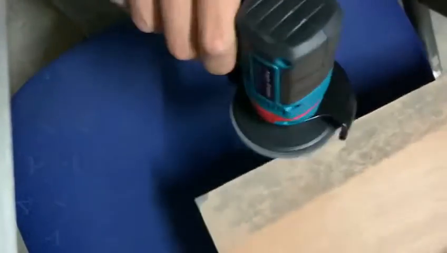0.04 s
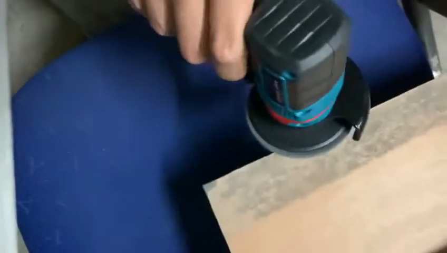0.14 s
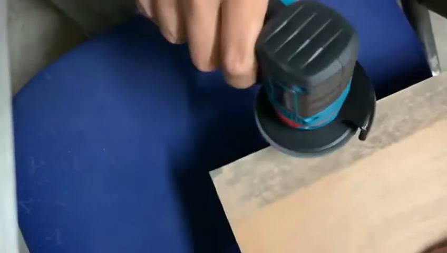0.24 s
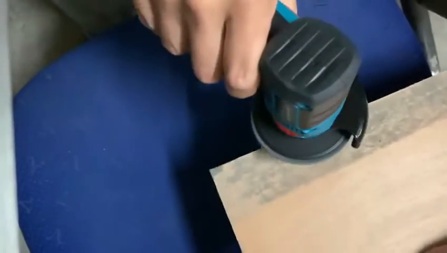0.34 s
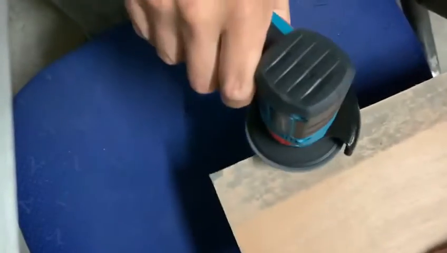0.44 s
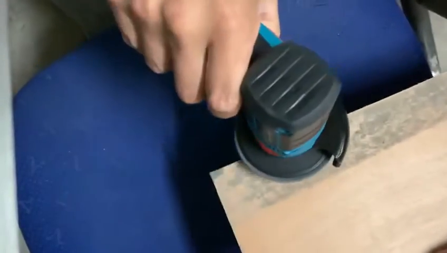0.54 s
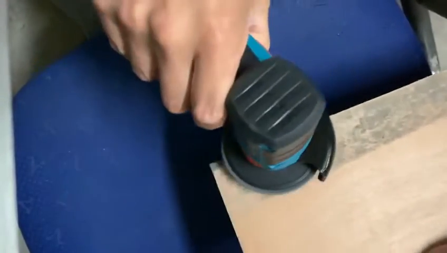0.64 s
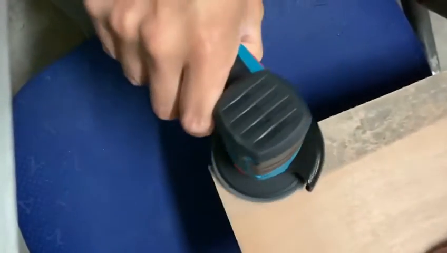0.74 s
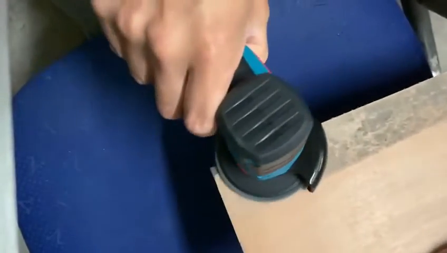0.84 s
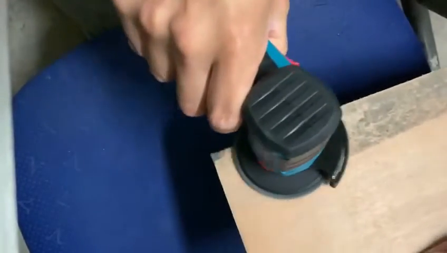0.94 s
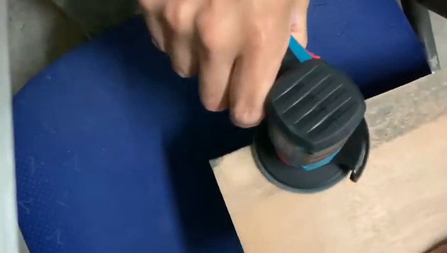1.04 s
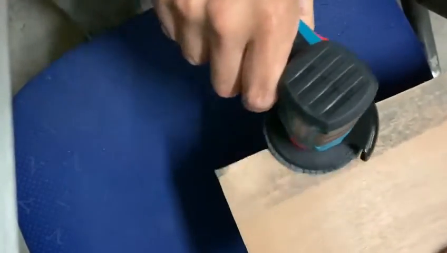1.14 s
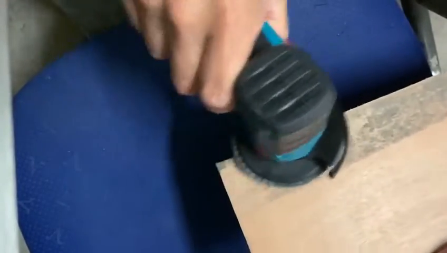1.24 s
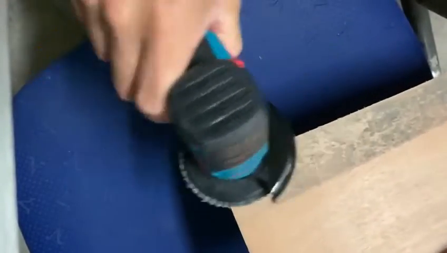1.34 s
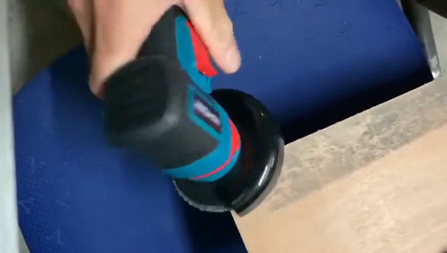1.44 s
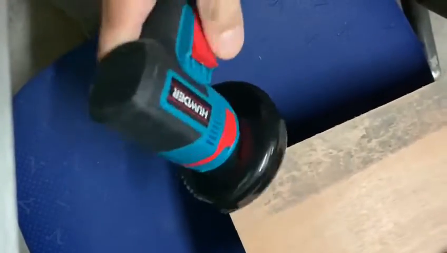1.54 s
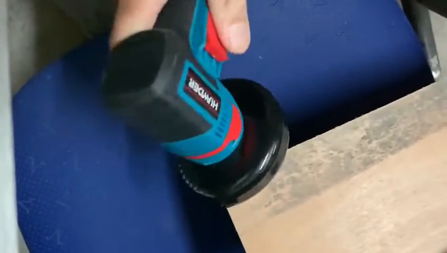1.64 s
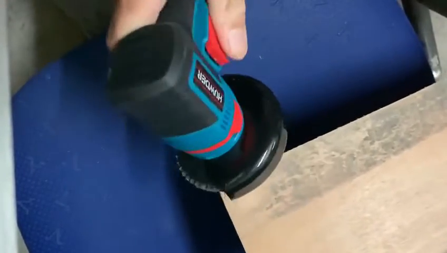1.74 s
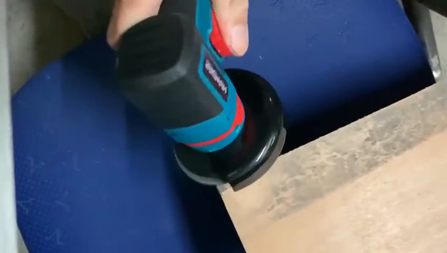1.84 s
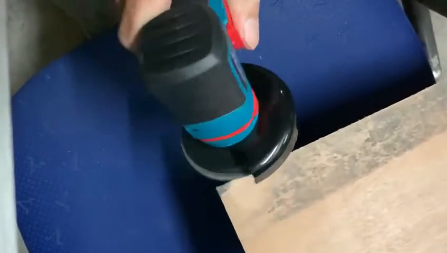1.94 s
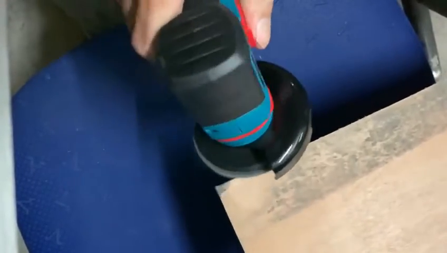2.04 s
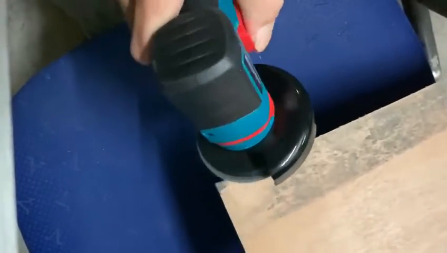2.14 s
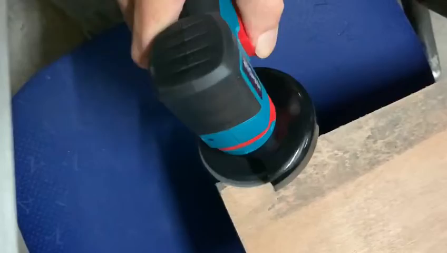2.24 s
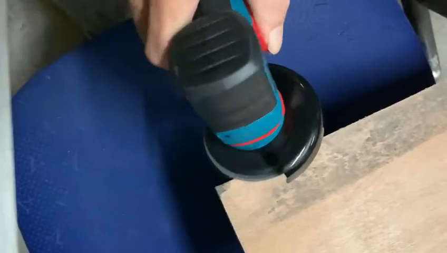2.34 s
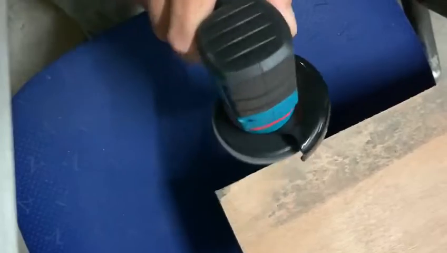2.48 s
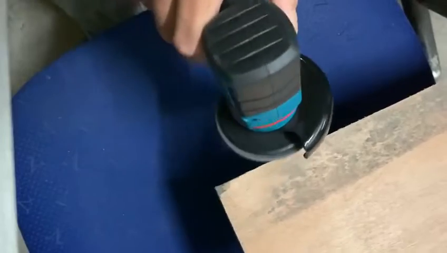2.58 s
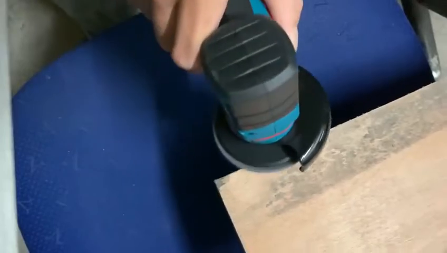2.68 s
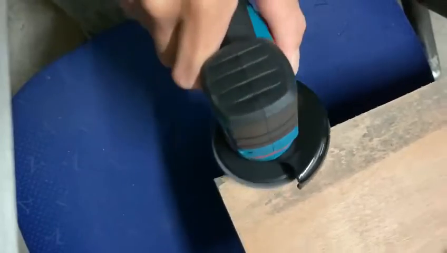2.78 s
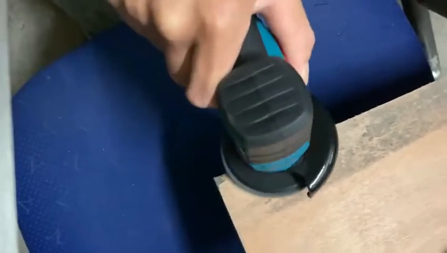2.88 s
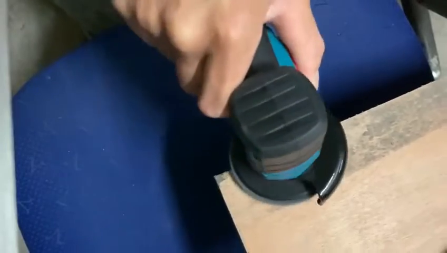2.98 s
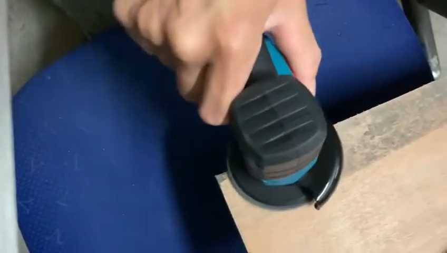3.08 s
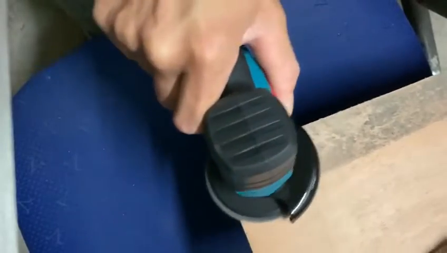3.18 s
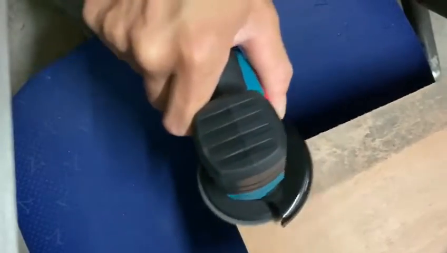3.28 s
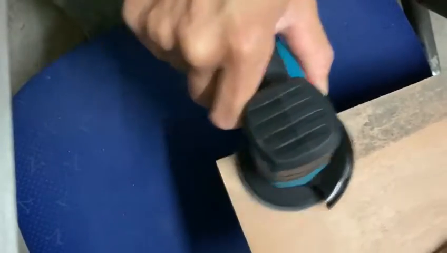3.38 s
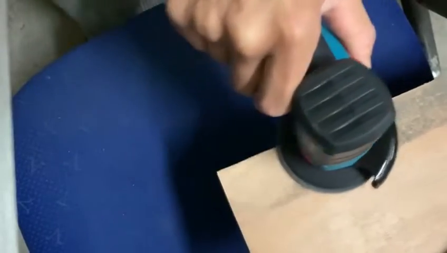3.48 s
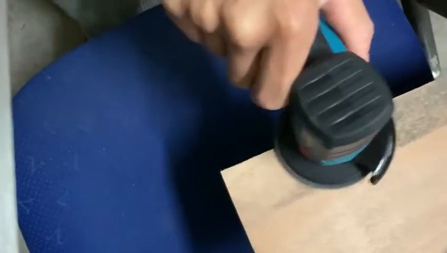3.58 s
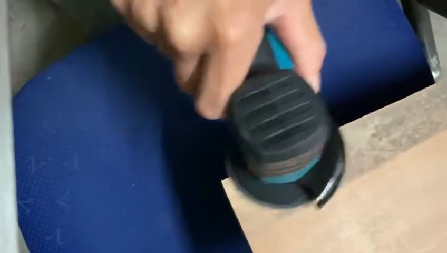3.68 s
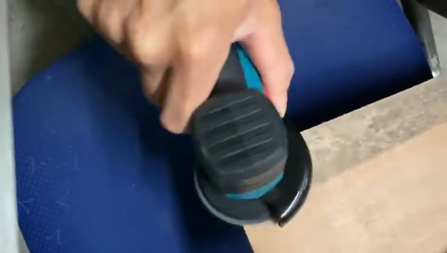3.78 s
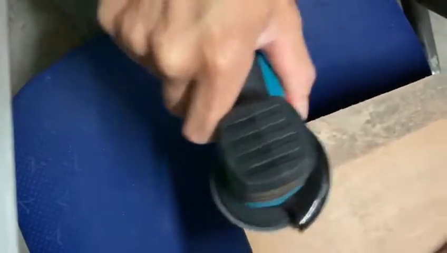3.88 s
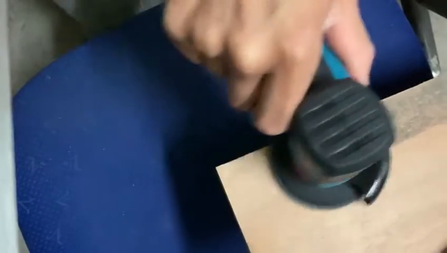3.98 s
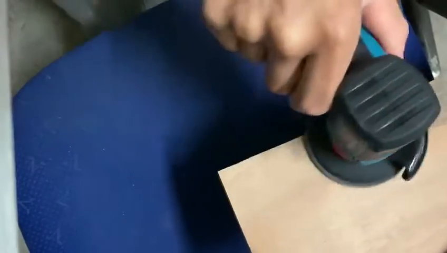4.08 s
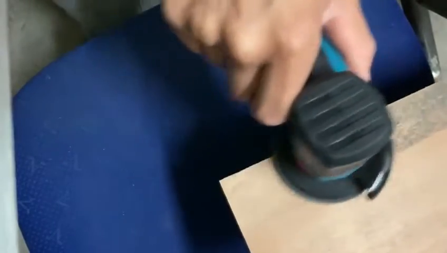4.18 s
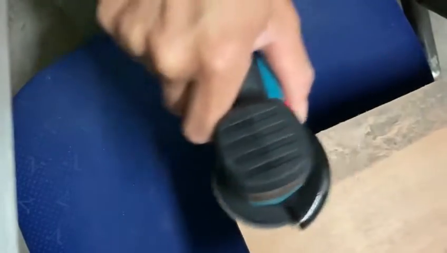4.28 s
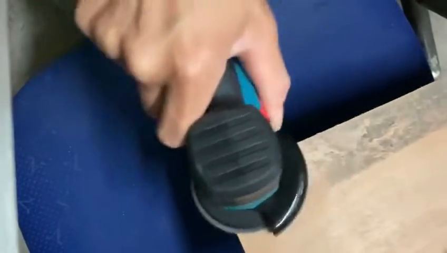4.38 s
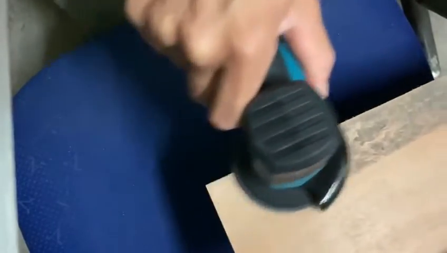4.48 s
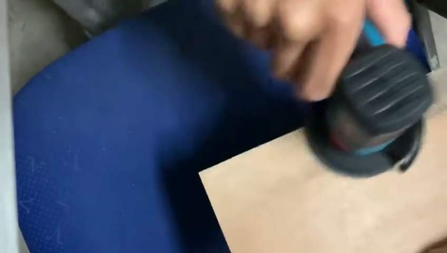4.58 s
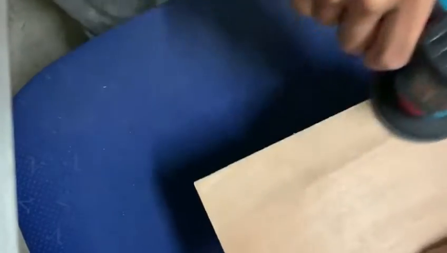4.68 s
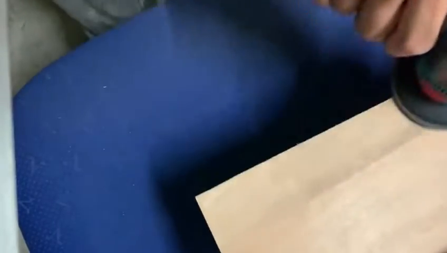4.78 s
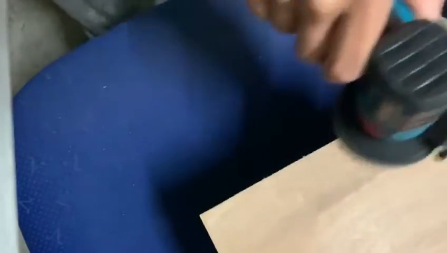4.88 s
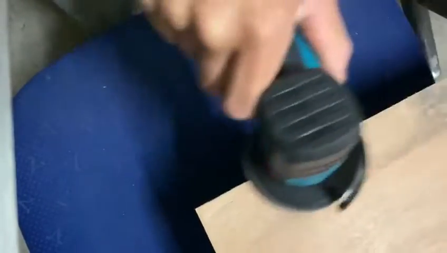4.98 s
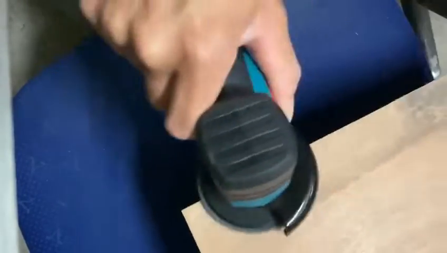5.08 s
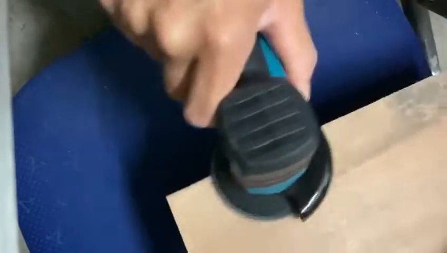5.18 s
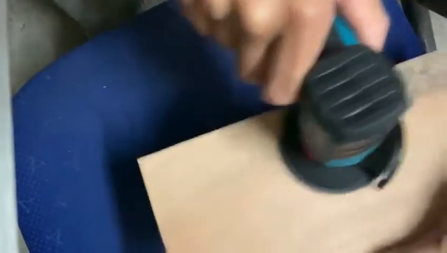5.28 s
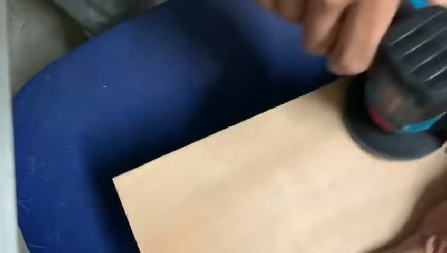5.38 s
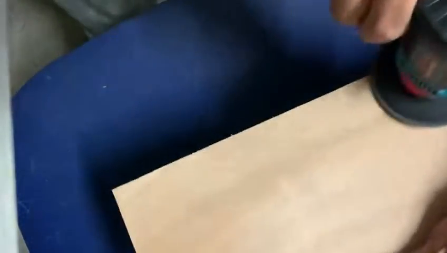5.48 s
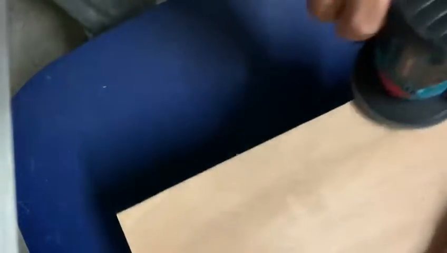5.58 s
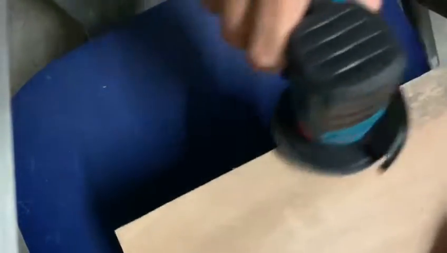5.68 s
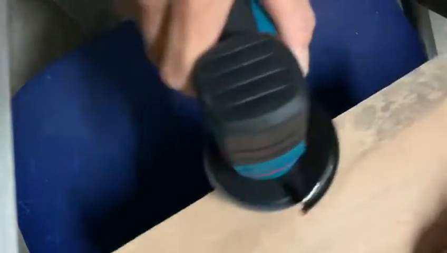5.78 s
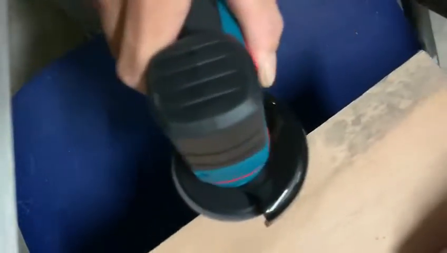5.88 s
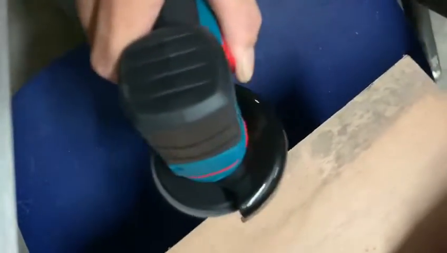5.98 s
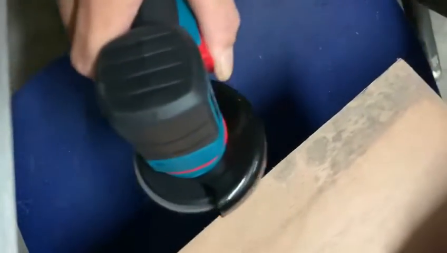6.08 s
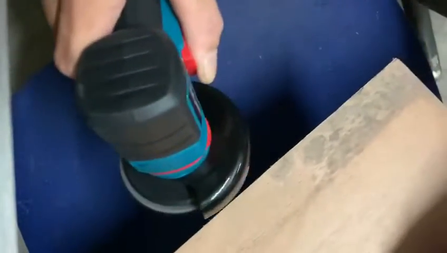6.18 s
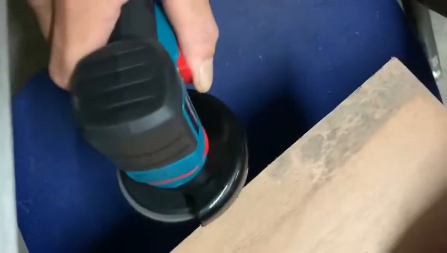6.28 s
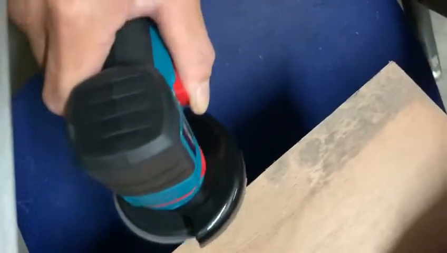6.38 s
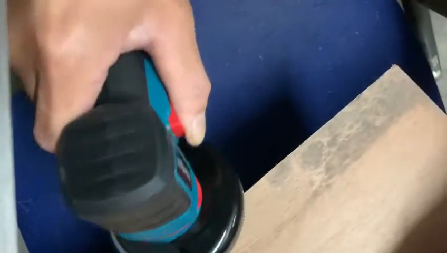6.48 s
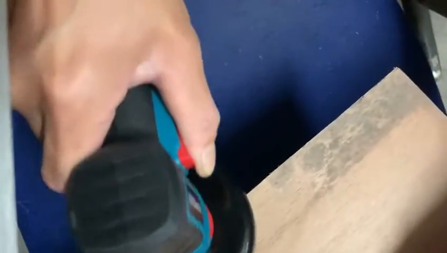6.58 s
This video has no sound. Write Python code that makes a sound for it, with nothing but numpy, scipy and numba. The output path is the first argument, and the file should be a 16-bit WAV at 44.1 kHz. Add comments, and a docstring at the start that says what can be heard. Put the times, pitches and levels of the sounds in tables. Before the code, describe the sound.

A small cordless grinder whines close up, stalls against a board edge, clicks back on, spins up and rasps wood in dipping strokes.

```python
"""A small cordless grinder runs close to a phone, shaft and magnet orders whining over fan hiss and disc wind.
It bites the edge of a board and stalls; single flaps scrape, then a thumb rubs and slides the plastic switch.
It spins up again with coil buzz and a high whistle, and is pressed on the wood in strokes that drag its speed
down: the flap disc rasps in a pattern that comes round every turn, and at times sings. It ends running off the
wood. A small hard room rings briefly throughout, over quiet room noise and a distant hum."""
import sys
import numpy as np
from scipy import signal
from scipy.fft import rfft, irfft
from scipy.io import wavfile
from scipy.ndimage import uniform_filter1d
from numba import njit

SR = 44100
rng = np.random.default_rng(int(sys.argv[2]) if len(sys.argv) > 2 else 0)


def store_pcm(level_fs):
    """Save levels as 16-bit WAV."""
    pcm = np.round(np.clip(level_fs, -1, 1) * 32767).astype(np.int16)
    wavfile.write(sys.argv[1], SR, np.atleast_2d(pcm).T)


N = 292383
TIME = np.arange(N) / SR
FREQ = np.fft.rfftfreq(N, 1 / SR) + 1  # 1 Hz up, so that no bin is zero


def undb(db):
    """Level in dB to gain."""
    return 10 ** (np.asarray(db) / 20)


def unit(x):
    """Scale x to an RMS of 1."""
    return x / np.sqrt(np.mean(x ** 2))


def noise():
    """White noise as long as the scene."""
    return rng.standard_normal(N)


def curves(table, outside=None):
    """Columns of a timed table, one value a sample."""
    time_s, *columns = np.transpose(table)
    return [np.interp(TIME, time_s, column, outside, outside) for column in columns]


def shape(points):
    """Gain per frequency through (pitch_hz, level_db) points."""
    pitch_hz, level_db = np.transpose(points)
    return undb(np.interp(np.log(FREQ), np.log(pitch_hz), level_db))


def bump(hz, centre_hz, width_hz, db):
    """Lift in dB around a resonance."""
    return db / (1 + (2 * (hz - centre_hz) / width_hz) ** 2)


def band(x, gain, lo_hz=0, hi_hz=SR):
    """Colour x and keep lo-hi with steep edges."""
    edges = 1 / np.sqrt((1 + (lo_hz / FREQ) ** 12) * (1 + (FREQ / hi_hz) ** 12))
    return irfft(rfft(x) * gain * edges, N)


def walk(rate):
    """Random levels held 1 / rate s and slewed twice; spread near 1."""
    size = int(SR / rate)
    steps = np.repeat(rng.standard_normal(N // size + 1), size)
    return 1.367 * uniform_filter1d(uniform_filter1d(steps, size), size)[:N]


def even(x, span_s=.06):
    """Hold the running level of x near 1 by dividing by its smoothed RMS."""
    size = int(span_s * SR)
    return x / np.sqrt(uniform_filter1d(uniform_filter1d(x ** 2, size), size))


@njit
def turns(x, hz, like):
    """Each turn replays part of the one before: the same flaps meet the same wood."""
    y = np.zeros(len(x))
    for i in range(len(x)):
        back = i - int(SR / hz[i] + .5)
        fresh = np.sqrt(1 - like[i] ** 2) * x[i]
        y[i] = fresh + (like[i] * y[back] if back >= 0 else 0.)
    return y


def touch(start, end, attack, release, first_db, last_db):
    """Gain of one contact: rise, hold, lift, falling 20 dB over one attack or release time."""
    outside = np.maximum(start - TIME, 0) / attack + np.maximum(TIME - end, 0) / release
    return undb(np.interp(TIME, [start, end], [first_db, last_db]) - 20 * np.minimum(outside, 8))


# Shaft speed: brake, soft start, then a dip under each stroke. Columns: time_s, turns_hz
SPEED = [(0, 247), (.26, 251.7), (.89, 251.5), (.925, 225), (1.02, 82), (1.08, 40), (1.77, 34.3),
         (1.85, 77), (1.885, 104), (1.93, 127.5), (2.03, 158), (2.14, 181.8), (2.33, 208.5), (2.49, 232),
         (2.58, 242), (2.68, 249), (3.05, 252.4), (3.13, 237.5), (3.27, 243.8), (3.38, 227.5), (3.46, 225),
         (3.55, 228.7), (3.67, 245), (3.79, 244.5), (4.01, 217), (4.25, 246.6), (4.4, 247.5), (4.46, 236),
         (4.62, 188.5), (4.68, 190), (4.78, 215.6), (4.89, 238.5), (5.12, 252), (5.19, 236.4), (5.3, 194.5),
         (5.43, 199.8), (5.5, 218.9), (5.61, 240.8), (5.83, 249.4), (6.08, 251.4), (6.63, 253)]
FREE_HZ, UP_TO_SPEED_S = 252, 3.0


def shaft():
    """Turning rate, running angle, and the speed lost to the wood once the tool is up to speed."""
    hz = uniform_filter1d(curves(SPEED)[0], size=SR // 25)
    angle = 2 * np.pi * np.cumsum(hz) / SR
    drag_hz = np.maximum(FREE_HZ - hz, 0) * (TIME > UP_TO_SPEED_S)
    return hz, angle, drag_hz


# Levels of the running tool as they rise and fall over time.
# Columns: time_s, fan_hiss_db, whine_db, third_order_db, disc_wind_db
TOOL_LEVELS = [(0, -19.5, -34.5, -37.5, -29.5), (.28, -19.5, -34, -30.5, -35), (.72, -24, -33, -34, -28),
               (.85, -25.5, -27.5, -23.5, -25), (.9, -27, -36.5, -40, -46), (.95, -33.5, -38.5, -42, -41),
               (1.0, -37.5, -45.5, -59, -45), (1.1, -42.5, -58, -60, -60), (1.2, -53.5, -77, -66, -63),
               (1.35, -79, -81.5, -69, -68.5), (1.75, -84.5, -70.5, -72.5, -70),
               (1.775, -46, -70, -72, -67), (1.83, -38, -69, -72, -63), (1.9, -33, -50.5, -67, -52),
               (2.1, -29.5, -41.5, -61, -38), (2.49, -23.5, -37, -45, -31),
               (3.02, -21.5, -36.5, -30.5, -25), (3.2, -32, -36.5, -56, -32.5),
               (3.42, -34.5, -39.5, -71, -30.5), (3.6, -34, -49.5, -60, -29.5),
               (3.77, -28.5, -34, -44, -31), (3.97, -41, -44.5, -57, -35.5), (4.2, -35, -48, -47, -34),
               (4.39, -54, -34.5, -53, -27.5), (4.65, -42.5, -45.5, -48, -44),
               (4.9, -32.5, -49.5, -64, -36.5), (5.05, -35.5, -44, -45, -35),
               (5.15, -32.5, -31.5, -44, -31.5), (5.33, -40, -48, -44.5, -25), (5.52, -38, -49, -53, -44),
               (5.64, -33.5, -48.5, -55, -42), (5.78, -31, -42.5, -56, -39.5),
               (6.1, -33, -41, -47.5, -37.5), (6.63, -34, -40.5, -55, -42)]
SWITCHED_ON_S = 1.762


def tool_levels(hz):
    """The four level curves, and a gate that opens with speed or on switching on."""
    running = np.clip(np.maximum((hz - 62) / 15, (TIME - SWITCHED_ON_S) / .02), 0, 1)
    return curves(TOOL_LEVELS), running


# Motor current, heard as the magnet orders.
# Columns: time_s, upper_orders_db, fourth_db, eighth_db, twelfth_db
PULL = [(0, -55, -37.5, -47, -62), (.3, -48, -31.5, -44, -54), (.5, -40, -46, -40, -42),
        (.83, -33, -37, -43, -57), (.862, -34, -44, -33, -57), (.885, -38, -47, -48, -57),
        (.93, -42, -34, -57, -50), (.97, -52, -45.5, -55, -50.5), (1.1, -79, -73.5, -75, -83.5),
        (1.755, -76.5, -60.5, -77, -85), (1.775, -54, -75, -78, -61), (1.82, -43, -62, -62, -39),
        (1.848, -40.5, -52, -38, -44), (1.87, -39, -45, -37, -55), (1.9, -38, -63, -35, -30),
        (1.95, -39, -58, -44, -42), (1.99, -37, -35.5, -50, -40), (2.05, -34.5, -32, -31.5, -45),
        (2.17, -32.5, -30, -53, -47), (2.3, -35.5, -32, -45, -40.5), (2.4, -34, -26.5, -33, -48),
        (2.5, -39, -34, -31.5, -41), (2.7, -32.5, -37.5, -39.5, -51), (3.05, -34, -36, -32, -57),
        (3.2, -46, -44, -58, -68), (3.55, -42, -47, -41, -56), (3.9, -48, -48, -62, -70),
        (4.2, -44, -49, -39.5, -84), (4.55, -39, -56, -48, -45.5), (4.78, -53, -41, -52, -55),
        (5.0, -46, -54, -45, -76), (5.16, -48, -51, -36, -63), (5.25, -46, -41, -58, -71),
        (5.38, -50, -40.5, -36, -42.5), (5.55, -74, -45, -54, -68), (5.7, -45.5, -49, -44.5, -63),
        (6.63, -40.5, -60, -50, -67)]
# Fifth order of the shaft. Columns: time_s, level_db
FIFTH = [(0, -37), (.86, -50), (.95, -57), (1.1, -78.5), (1.85, -70.5), (1.97, -41.5), (2.3, -43),
         (2.6, -40), (3, -41.5), (3.3, -44), (4.2, -54), (5.2, -53), (6.63, -51)]
# Fan blades, the ninth order. Columns: time_s, level_db
NINTH = [(0, -52), (.87, -67.5), (1.1, -79.5), (2.5, -48.5), (5.6, -60.5), (5.8, -52.5), (6.63, -48)]
# Orders that follow the whine: turns multiplied, and level_db re whine
SHAFT_MULTIPLES = (1, 2, 6, 7, 10, 11)
SHAFT_DB = [0.5, -1, -13.5, -10.5, -17.5, -19]
# Orders that follow the current: turns multiplied, and level_db re the upper-order current
MAGNET_MULTIPLES = (16, 20, 24, 28, 32)
MAGNET_DB = [6, 1, -9, 7, 0]
# How well the body radiates the orders. Columns: pitch_hz, level_db
BODY = [(150, -4), (200, 0), (228, -3.5), (250, -3), (330, 2.5), (400, 3), (460, -4), (500, -1), (1000, 1),
        (1300, 0), (1600, -3.5), (1900, -7), (2200, 0.5)]
# Housing resonance that lifts what passes through it. Columns: pitch_hz, width_hz, lift_db
HOUSING = (2650, 1000, 6)
HOUSING_LOW_HZ, HOUSING_TOP_HZ = 1800, 2960
LOAD_DB_PER_HZ = 0.17  # the upper shaft orders sing out as the wood slows the disc
# the orders hold steady running free and roughen as the wood drags
WAVER_DB, FLUTTER_DB, FLUTTER_DB_PER_HZ = .8, .9, .04


def motor_orders(hz, angle, whine_db, third_db, drag_hz):
    """Sines on multiples of the shaft rate, each wavering in level and coloured by body and housing."""
    pull_db, fourth_db, eighth_db, twelfth_db = curves(PULL)
    orders = [(3, third_db), (4, fourth_db), (5, curves(FIFTH)[0]),
              (8, eighth_db), (12, twelfth_db), (9, curves(NINTH)[0])]
    for k, db in zip(SHAFT_MULTIPLES, SHAFT_DB):
        load_db = LOAD_DB_PER_HZ * drag_hz * (k > 4)
        orders.append((k, whine_db + db + load_db))
    for k, db in zip(MAGNET_MULTIPLES, MAGNET_DB):
        # the housing passes little above or far below its resonance
        above, below = (k * hz / HOUSING_TOP_HZ) ** 24, (HOUSING_LOW_HZ / k / hz) ** 4
        orders.append((k, pull_db + db - 20 * np.log10(1 + above + below)))
    body_hz, body_db = np.transpose(BODY)
    flutter_db = FLUTTER_DB + FLUTTER_DB_PER_HZ * drag_hz
    out = np.zeros(N)
    for k, db in orders:
        radiated_db = np.interp(k * hz, body_hz, body_db) + bump(k * hz, *HOUSING)
        unsteady_db = WAVER_DB * walk(7) + flutter_db * walk(45)
        out += undb(db + radiated_db + unsteady_db) * np.sin(k * angle + rng.uniform(0, 2 * np.pi))
    return np.sqrt(2) * out


def coil_buzz(hz):
    """The coils buzz in the housing under current: resonant noise, stronger at low speed."""
    buzz = unit(band(noise(), undb(bump(FREQ, *HOUSING)), 1200, HOUSING_TOP_HZ))
    return buzz * undb(curves(PULL)[0] - 3.0 + 28 * np.clip(1 - hz / 125, 0, 1))


# Colour of the fan hiss. Columns: pitch_hz, level_db
FAN_COLOUR = [(400, -7), (800, 0), (1100, -5), (2200, -4), (3300, -2.5), (4200, -1.5), (5500, -3.5),
              (6800, -2), (8500, 0.5), (11000, 0), (14000, 0.5), (15500, -7)]
# the hiss loses its top as the shaft falls under the open speed
FAN_TOP_HZ, FAN_DULL_DB, FAN_OPEN_HZ = 11500, -22, 190


def fan(hz, angle, fan_db):
    """Hiss of moving air that throbs slightly once a turn and dulls as the shaft slows."""
    hiss = noise() * (1 + 0.065 * np.cos(angle)) * undb(0.82 * walk(16))
    hiss = unit(band(hiss, shape(FAN_COLOUR), 250))
    top = band(hiss, 1, FAN_TOP_HZ)
    dulling = undb(FAN_DULL_DB * np.clip(1 - hz / FAN_OPEN_HZ, 0, 1))
    return (hiss - top + top * dulling) * undb(fan_db)


# Colour of the disc's wind. Columns: pitch_hz, level_db
WIND_COLOUR = [(60, -36.5), (120, -7), (250, -1), (400, -4), (600, -8.5), (900, -18.5)]
WIND_DB_PER_HZ = -0.4092  # wind lost per Hz of speed lost to the wood


def disc_wind(wind_db, drag_hz, running):
    """Buffeting low noise of the air the disc throws, weaker as the wood slows it."""
    level_db = wind_db + WIND_DB_PER_HZ * drag_hz + 40 * (running - 1)
    gusts_db = 1.2 * walk(15)
    return unit(band(noise(), shape(WIND_COLOUR))) * undb(level_db + gusts_db)


# Colour of the rumble. Columns: pitch_hz, level_db
RUMBLE_COLOUR = [(20, -19.5), (40, -11.5), (70, 2), (100, 4.5), (140, -23)]
RUMBLE_DB, RUMBLE_SLOPE = -47.5, 0.9  # at a fan level of -26 dB; dB per dB of fan
RUMBLE_DB_PER_HZ = -0.5  # rumble lost per Hz of speed lost to the wood


def rumble(fan_db, drag_hz):
    """Deep noise that swells with the fan and sinks as the wood drags."""
    level_db = RUMBLE_DB + RUMBLE_SLOPE * (fan_db + 26) + RUMBLE_DB_PER_HZ * drag_hz
    return unit(band(noise(), shape(RUMBLE_COLOUR))) * undb(level_db + 1.8 * walk(14))


# Distant appliance. Columns: pitch_hz, level_db
HUM = [(102.3, -67), (193.8, -80)]
# Colour of the room noise. Columns: pitch_hz, level_db (per Hz)
FLOOR = [(15, -39.5), (25, -16.5), (118, -9.5), (163, -22.5), (621, -32.5), (978, -52), (1670, -46),
         (2630, -39.5), (3440, -45), (15000, -65.5)]
FLOOR_DB = -62.5


def background():
    """Quiet room noise and a wavering hum."""
    hum = np.zeros(N)
    for hz, db in HUM:
        hum += np.sqrt(2) * undb(db + 1.5 * walk(6)) * np.sin(2 * np.pi * hz * TIME)
    return unit(band(noise(), shape(FLOOR))) * undb(FLOOR_DB) + hum


ROOM_T60_S, ROOM_TREBLE_T60_S, ROOM_CROSS_HZ, ROOM_DB = .5, .25, 7500, -21


def tail(t60, treble_t60):
    """Spectrum of a decaying noise response of energy 1; the treble has its own decay."""
    burst, t = rng.standard_normal(SR // 2), TIME[:SR // 2]
    low, top = (rfft(burst * 1000 ** (-t / s), N) for s in (t60, treble_t60))
    high = 1 / (1 + (ROOM_CROSS_HZ / FREQ) ** 4)
    response = low * (1 - high) + top * high
    return response / np.sqrt(np.mean(np.abs(response) ** 2))


def room():
    """Direct sound plus the short ring of a small hard room, as a spectrum."""
    return 1 + undb(ROOM_DB) * tail(ROOM_T60_S, ROOM_TREBLE_T60_S)


# Left port against right. Columns: pitch_hz, level_db, late_share (0-1), unrelated_share (0-1)
PORTS = [(40, 0, .96, .28), (120, 0, .99, .12), (250, .2, .995, .08), (400, -1.5, .96, .25),
         (500, -6, .78, .6), (620, -14, .75, .65), (800, -15, .65, .7), (1100, -6, .7, .7),
         (1500, -5, .75, .65), (2100, -7, .6, .8), (2600, -3, .72, .68), (3400, -2, .55, .8),
         (4200, 1, .68, .75), (6300, 0, .6, .75), (7200, 0, .02, .06), (11500, 0, .02, .1),
         (13200, 0, .25, .55), (15000, 0, .35, .8)]
LEFT_LAG_S, LEFT_SCATTER_S, SHIFT_HZ = 22.5 / SR, .05, 5


def left_port(noises, tones):
    """Port behind the phone: later, shadowed in the middle, partly fed by reflections."""
    port_hz, *columns = np.transpose(PORTS)
    db, late, loose = (np.interp(np.log(FREQ), np.log(port_hz), c) for c in columns)
    late, loose = np.clip(late, 0, 1), np.clip(loose, 0, 1)
    # above about 7 kHz both channels carry nearly the same
    same = np.sqrt(np.clip(1 - late ** 2 - loose ** 2, 0, 1)) * np.clip((FREQ - 6400) / 800, 0, 1)
    lag = np.exp(-2j * np.pi * FREQ * LEFT_LAG_S)
    # the motor's tones reach it steadily, round the edge of the phone
    steady = tones * (np.hypot(late, loose) - late) * lag
    direct = irfft(undb(db) * ((noises + tones) * (same + late * lag) + steady), N)
    # two scattered tails blend in and out, so the left channel's loose part keeps changing
    blend = 2 * np.pi * np.cumsum(SHIFT_HZ * walk(4)) / SR
    scattered = noises * undb(db) * loose
    near, far = (irfft(scattered * tail(LEFT_SCATTER_S, LEFT_SCATTER_S), N) for _ in range(2))
    return direct + np.cos(blend) * near + np.sin(blend) * far


# Disc on wood. Columns: start_s, end_s, attack_s, release_s, first_db, last_db, board_knock_db (re rasp),
# lower_rasp_db (re rasp), high_spot_beat_db (re rasp), likeness of one turn to the last (0-1)
CONTACTS = [(0.86, 0.868, 0.04, 0.0051, -13.5, -14, -8, -13, -17, 0.3),
            (0.91, 1.001, 0.04, 0.027, -24.5, -27, -16.5, -8.5, -14, 0.57),
            (3.067, 3.098, 0.018, .03, -15, -27, -28, -8.5, -9, 0.55),
            (3.119, 3.151, 0.035, 0.038, -20, -20.5, -4.5, -2.5, -12, 0.42),
            (3.166, 3.187, .02, 0.023, -28, -26, -9, -7, -14, 0.76),
            (3.293, 3.334, 0.17, 0.06, -20, -21.5, -3, -5, -6.5, 0.54),
            (3.36, 3.514, 0.027, 0.18, -21.5, -21.5, -6.5, -15.5, -6, 0.68),
            (3.679, 3.713, 0.041, 0.017, -22, -23, -12.5, -4.5, -18, 0.64),
            (3.755, 3.799, 0.029, 0.084, -26.5, -25.5, -4, 6, -3.5, 0.37),
            (3.923, 4.041, 0.17, 0.22, -22.5, -26.5, -5, -16, -9, 0.41),
            (4.45, 4.704, 0.14, 0.13, -21, -23.5, -5, -7.5, -13, 0.43),
            (5.142, 5.265, 0.0099, 0.015, -16.5, -17.5, -7, -20, -13, 0.37),
            (5.283, 5.293, 0.013, 0.018, -22, -19.5, -17, -21, -22, 0.1),
            (5.308, 5.34, .012, 0.044, -29, -31.5, -10, -10, -19, .6),
            (5.364, 5.447, 0.056, 0.096, -23, -26, -2, -5, -23, 0.43)]
# Colour of the rasp. Columns: pitch_hz, level_db
RASP_COLOUR = [(500, -14.5), (900, -19.5), (1500, -14), (2300, -15.5), (3200, -19.5), (4200, -9),
               (5500, -12.5), (6600, -7.5), (8600, -5.5), (9500, -7), (12400, -1.5), (14000, -4.5),
               (15500, 0)]
# Ringing bands of the disc. Columns: pitch_hz, width_hz, lift_db
DISC_RINGS = [(7680, 120, 10), (5400, 320, 9), (3740, 250, -2), (12370, 160, 4)]
# harder pressure slows the disc and damps the board
KNOCK_DB_PER_HZ, LOWER_DB_PER_HZ = -0.3075, -0.1157
# Band of the flare: low_hz, high_hz
FLARE_HZ = (9830, 13500)
# brighter rasp as the disc is pressed down, up to a limit of speed lost
FLARE_DB, FLARE_DB_PER_HZ, FLARE_FULL_HZ = -23, .5, 30.2


def rasp_colour():
    """Gain per frequency that board and disc give the rasp."""
    return shape(RASP_COLOUR) * undb(sum(bump(FREQ, *ring) for ring in DISC_RINGS))


def rasp(hz, angle, drag_hz):
    """Grit tears at the wood, hardest where the disc runs high; board and disc colour it."""
    gains = np.array([touch(*row[:6]) for row in CONTACTS])
    knock_db, lower_db, beat_db, likeness = np.transpose(CONTACTS)[6:]
    pressure = gains.sum(0)
    like = np.clip(likeness @ gains / pressure, 0, .95)
    grit = noise() * undb(0.32 * rng.exponential(1, N))
    grit *= np.exp(.22 * np.cos(angle))
    grit *= undb(2 * walk(30) + 2.4 * walk(10))
    sharp = turns(grit, hz, np.clip(like + .08, 0, .94))
    # the board's knock and the lower rasp repeat best
    blunt = turns(grit * np.exp(.15 * np.cos(angle)), hz, np.clip(like + .38, 0, .94))
    colour = rasp_colour()
    knock = even(band(blunt, colour, 600, 2700)) * undb(KNOCK_DB_PER_HZ * drag_hz)
    lower = even(band(blunt, colour, 3300, 8100)) * undb(LOWER_DB_PER_HZ * drag_hz)
    upper = even(band(sharp, colour, 4500)) * undb(1.5 * walk(35))
    flare_db = FLARE_DB + FLARE_DB_PER_HZ * np.minimum(drag_hz, FLARE_FULL_HZ)
    flare = even(band(sharp, 1, *FLARE_HZ)) * undb(flare_db + 2.0 * walk(25))
    out = (upper + flare) * pressure
    out += knock * (undb(knock_db) @ gains) + lower * (undb(lower_db) @ gains)
    return out + beat(angle, drag_hz, undb(beat_db) @ gains)


# Colour of the beat. Columns: pitch_hz, level_db
BEAT_COLOUR = [(700, -18), (1100, -5), (1500, 0), (2000, -1), (2500, -3), (3000, -7), (3500, 2), (4200, 3),
               (5000, -1), (5600, 4), (6600, 3), (7700, 4), (9000, -6)]
BEAT_SHARPNESS, BEAT_SMEAR_S = 500, .003  # narrowness of the blow; delay at 4 kHz, growing with pitch
BEAT_SCATTER_DB, BEAT_JITTER_RAD = 2.6, .07  # blow to blow
BEAT_DB_PER_HZ = -0.2134  # beat lost per Hz of speed lost to the wood


def beat(angle, drag_hz, gain):
    """The high spot of the disc strikes the board once a turn, never twice alike."""
    jittered = angle + BEAT_JITTER_RAD * walk(80)
    blows = np.exp(BEAT_SHARPNESS * (np.cos(jittered) - 1)) * undb(BEAT_SCATTER_DB * walk(70))
    smear = np.exp(-1j * np.pi * BEAT_SMEAR_S * FREQ ** 2 / 4000)
    struck = unit(band(blows, shape(BEAT_COLOUR) * smear, 600, 9500))
    return struck * undb(BEAT_DB_PER_HZ * drag_hz) * gain


# Jolts through the bench. Columns: peak_s, level_db
THUMPS = [(.86, -53), (1.07, -45.5), (4.36, -42), (5.3, -44)]
# Band of the jolts: low_hz, high_hz
THUMP_HZ = (60, 150)
THUMP_S = 0.037


def jolts():
    """Dull swells of low noise as the bench is jolted."""
    gain = sum(undb(db) * np.exp(-((TIME - s) / THUMP_S) ** 2) for s, db in THUMPS)
    return unit(band(noise(), 1, *THUMP_HZ)) * gain


# Lone scrapes of a flap, peaking one length after the start. Columns: start_s, peak_db, length_s
SCRAPES = [(1.011, -19, 0.004), (1.028, -12.5, 0.0012), (1.046, -14, 0.0026), (1.069, -20.5, 0.0048),
           (1.084, -30, .008), (3.041, -6.5, 0.0073), (4.198, -29, 0.0065), (4.286, -19.5, 0.003),
           (4.299, -20, 0.0032), (4.981, -20.5, 0.0018), (5.112, -23, .003)]


def scrapes():
    """Short bursts of rasp as a single flap catches the edge."""
    gain = sum(undb(db) * np.exp(-((TIME - s - length) / length) ** 2) for s, db, length in SCRAPES)
    return unit(band(noise(), rasp_colour())) * gain


# Slide switch, small ticks of the housing and first jolts of the rotor.
# Columns: start_s, knock_db, bright_tick_db
SWITCH = [(1.4187, -62, -72), (1.4431, -67, -72), (1.514, -66, -90), (1.5918, -48, -72), (1.608, -60, -90),
          (1.6464, -60, -62), (1.6546, -53, -66), (1.6772, -44, -32), (1.7424, -33, -37),
          (1.7474, -21, -25), (1.7552, -20.5, -26), (1.7826, -33, -55)]
# Dead modes of the plastic. Columns: pitch_hz, level_db, t60_s
SWITCH_MODES = [(2310, 0, .012), (2780, 0, .012), (2550, -3, .008), (1420, -12, .008), (4200, -14, .006),
                (850, -14, .008)]


def switch():
    """Plastic snaps: a few dead modes, struck unevenly for a moment, and a bright tick."""
    out, t = np.zeros(N), TIME[:2000]
    ring = sum(undb(db) * np.sin(2 * np.pi * hz * t) * 1000 ** (-t / t60) for hz, db, t60 in SWITCH_MODES)
    for start_s, knock_db, tick_db in SWITCH:
        grain = rng.standard_normal(len(t))
        strike = grain * np.exp(-t / 0.0026) * (1 - np.exp(-t / 0.0004))
        body = np.convolve(ring, strike)[:len(t)]
        tick = (grain - .5 * np.roll(grain, 2)) * 1000 ** (-t / 0.012) * (1 - np.exp(-t / 0.00022))
        snap = undb(knock_db) * body / np.abs(body).max() + undb(tick_db) * tick
        out[int(start_s * SR):][:len(t)] += snap
    return band(out, 1, 550)


# Thumb rubbing over the housing and sliding the switch. Columns: start_s, end_s, level_db
THUMB = [(1.425, 1.465, -75), (1.595, 1.637, -76), (1.645, 1.742, -59)]


def thumb():
    """Skin drags over plastic in an uneven rustle."""
    gain = sum(undb(db) * np.clip(np.minimum(TIME - a, b - TIME) / .006, 0, 1) for a, b, db in THUMB)
    return unit(band(noise() * undb(2.5 * walk(120)), 1, 1300, 8200)) * gain


# Level of the speed controller's whistle. Columns: time_s, level_db
CHOPPER = [(1.8, -90), (1.84, -43), (2.1, -41), (2.3, -46), (2.6, -58), (2.75, -90)]
CHOPPER_HZ = 16000


def controller_whistle(angle):
    """A sine four shaft orders under the controller's chopping rate, so it falls as the shaft speeds up."""
    tone = np.sin(2 * np.pi * CHOPPER_HZ * TIME - 4 * angle)
    return np.sqrt(2) * undb(curves(CHOPPER, -120)[0]) * tone


# The disc sings briefly in a narrow band.
# Columns: start_s, end_s, attack_s, release_s, first_db, last_db, pitch_hz
SINGS = [(3.39, 3.53, .03, .03, -30, -29, 7700), (3.42, 3.5, .04, .04, -29, -29, 12200),
         (3.5, 3.555, .05, .02, -30, -28, 10900), (3.762, 3.8, .02, .03, -28, -34, 8500),
         (3.767, 3.818, .02, .02, -26, -33, 12200), (3.875, 3.95, .03, .03, -32, -32, 7800),
         (3.96, 4.076, .04, .069, -28, -28, 10400), (4.0, 4.012, .01, .02, -26, -26, 10200),
         (3.98, 4.05, .06, .04, -30, -29, 12200), (5.141, 5.165, .012, .04, -31, -34, 4050),
         (5.145, 5.17, .012, .02, -26, -32, 13200), (5.15, 5.17, .011, .02, -22, -27, 11200),
         (5.157, 5.18, .012, .04, -40, -42, 2020)]
SING_WIDTH_HZ, SING_LIKENESS = 900, .7


def sings(hz, angle):
    """Bands of rasp that swell and fade, riding on the nearest order of the shaft."""
    a, b = (turns(walk(SING_WIDTH_HZ), hz, np.full(N, SING_LIKENESS)) for _ in range(2))
    out = np.zeros(N)
    for *contact, pitch_hz in SINGS:
        middle_s = np.mean(contact[:2])
        phase = np.round(pitch_hz / np.interp(middle_s, TIME, hz)) * angle
        out += touch(*contact) * (a * np.sin(phase) + b * np.cos(phase))
    return out


def scene():
    """All sources in the room, as the two ports of the phone hear them."""
    hz, angle, drag_hz = shaft()
    (fan_db, whine_db, third_db, wind_db), running = tool_levels(hz)
    motor = motor_orders(hz, angle, whine_db, third_db, drag_hz) + coil_buzz(hz) + controller_whistle(angle)
    air = fan(hz, angle, fan_db) + disc_wind(wind_db, drag_hz, running) + rumble(fan_db, drag_hz)
    sanding = rasp(hz, angle, drag_hz) + jolts() + scrapes() + sings(hz, angle)
    handling = switch() + thumb()
    ring = room()
    noises = rfft(air + sanding + handling) * ring + rfft(background())
    tones = rfft(running * motor) * ring
    return np.array([left_port(noises, tones), irfft(noises + tones, N)])


TOP_HZ = 15800


def record(dry):
    """The phone cuts the top steeply."""
    return signal.sosfilt(signal.ellip(14, .2, 88, TOP_HZ, fs=SR, output="sos"), dry)


dry = scene()
out = record(dry)
store_pcm(out)
```